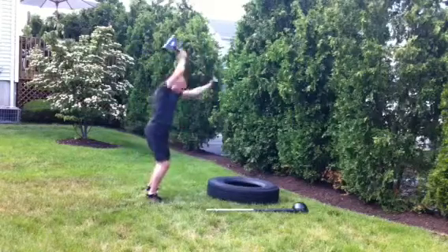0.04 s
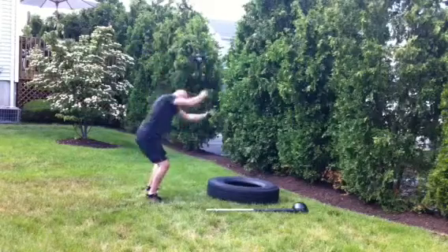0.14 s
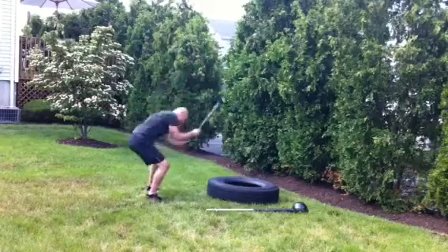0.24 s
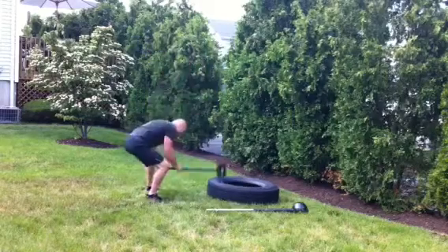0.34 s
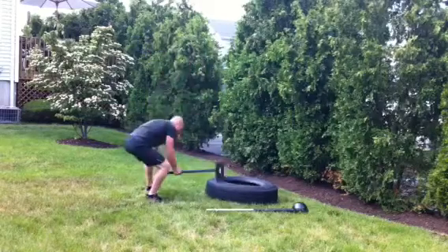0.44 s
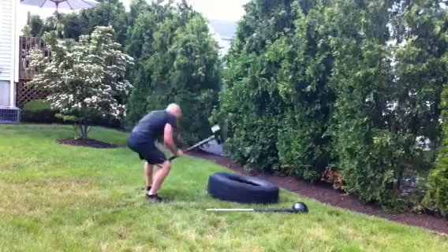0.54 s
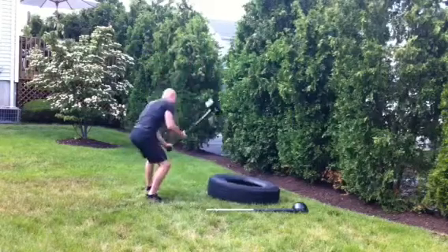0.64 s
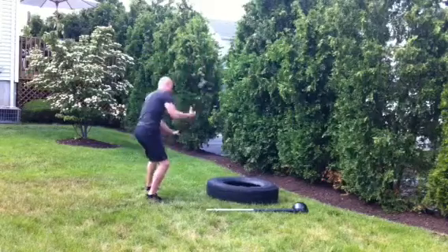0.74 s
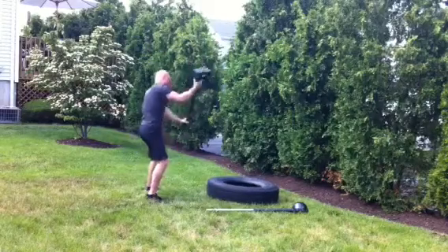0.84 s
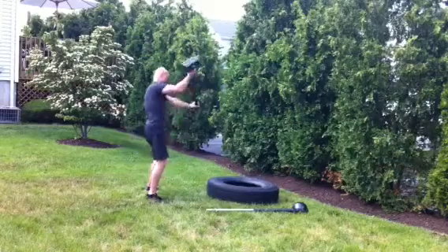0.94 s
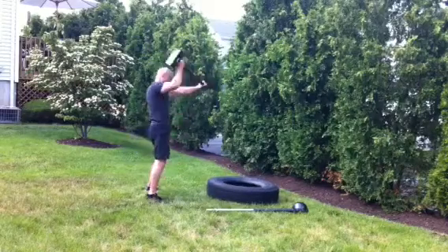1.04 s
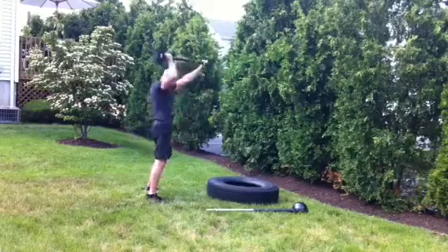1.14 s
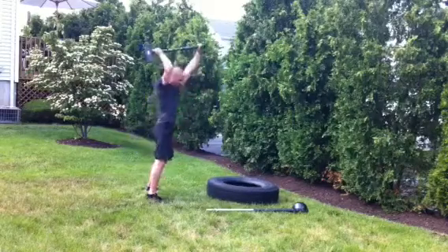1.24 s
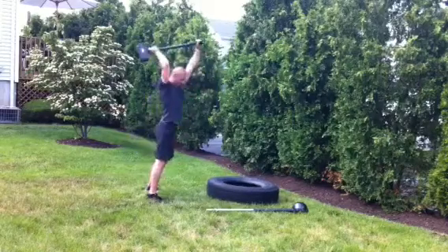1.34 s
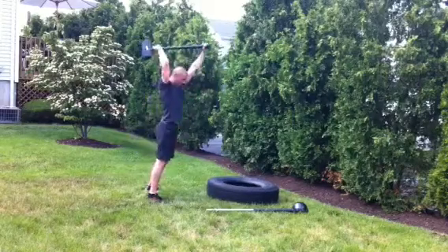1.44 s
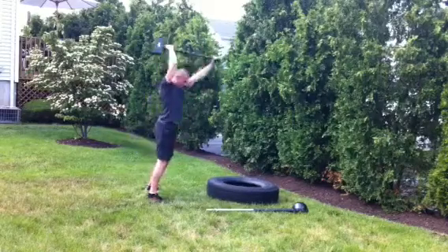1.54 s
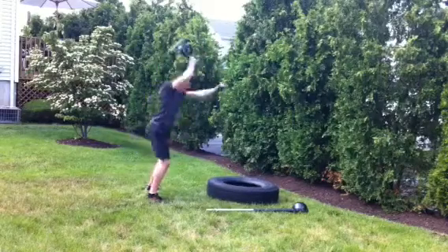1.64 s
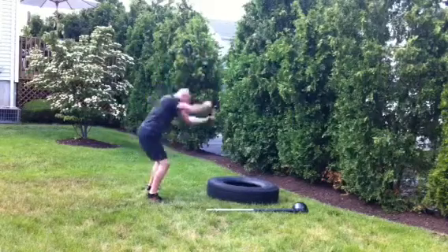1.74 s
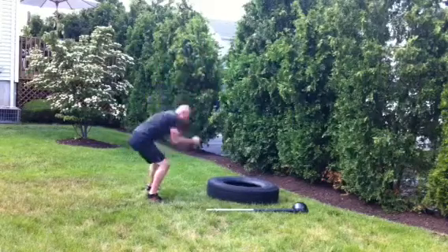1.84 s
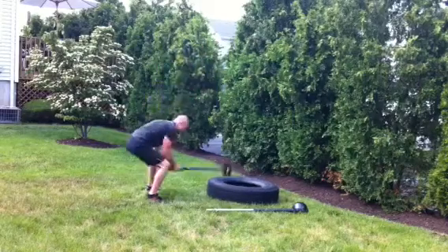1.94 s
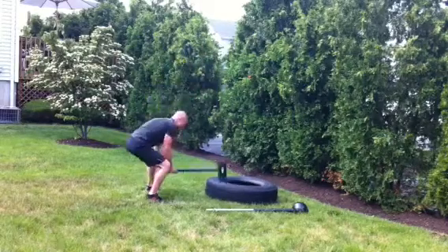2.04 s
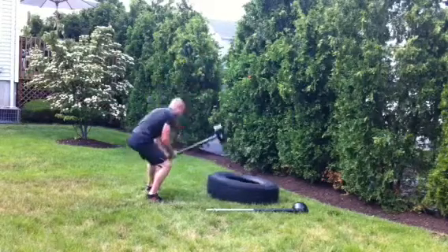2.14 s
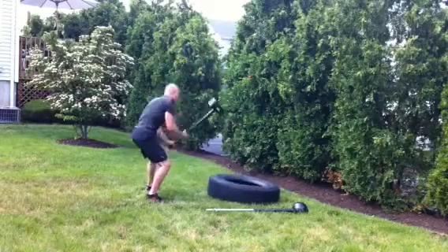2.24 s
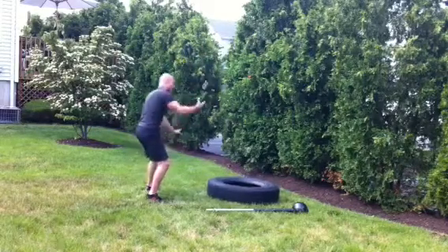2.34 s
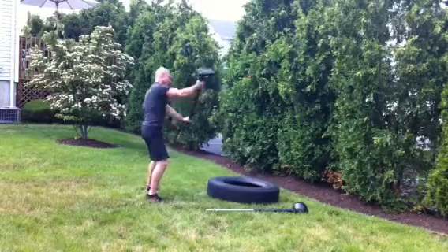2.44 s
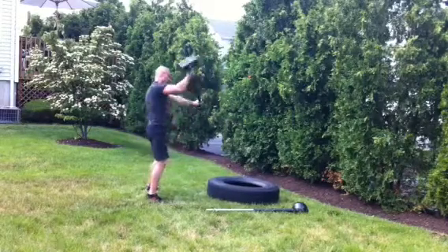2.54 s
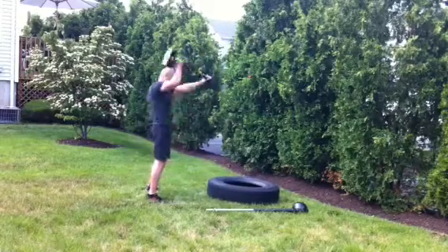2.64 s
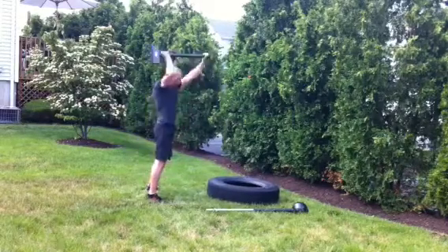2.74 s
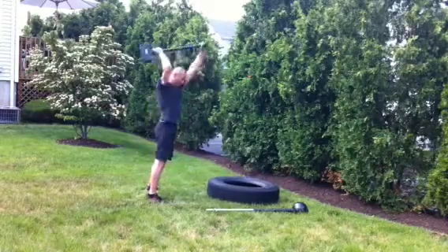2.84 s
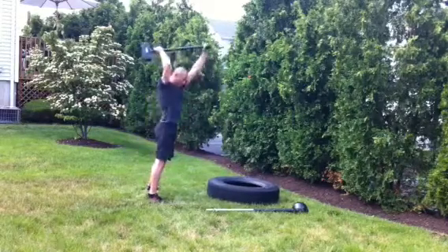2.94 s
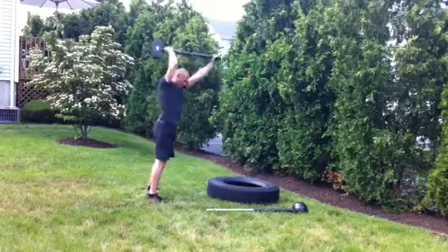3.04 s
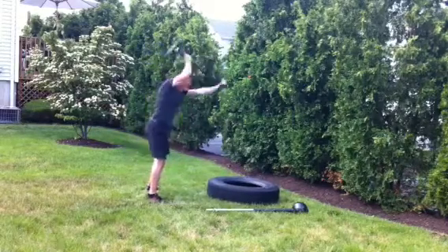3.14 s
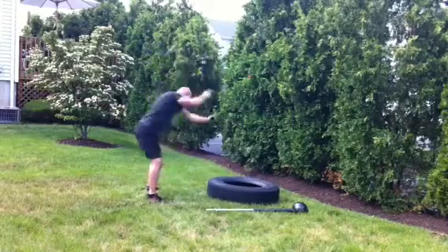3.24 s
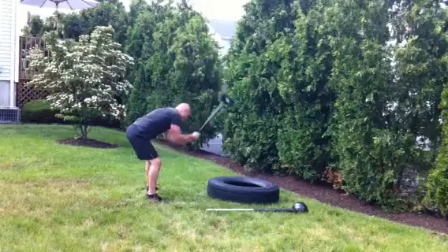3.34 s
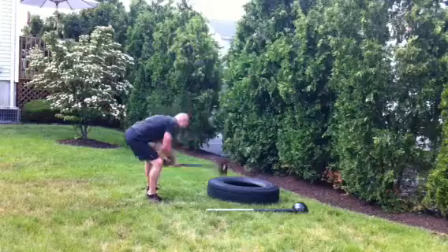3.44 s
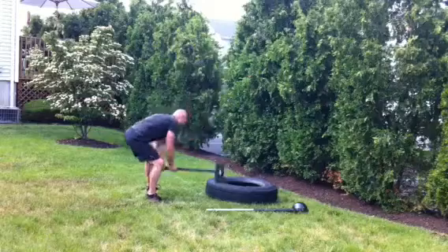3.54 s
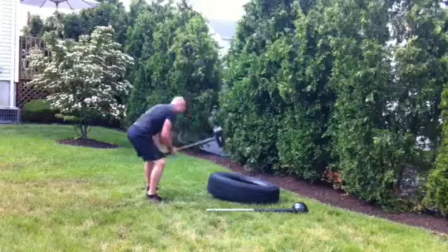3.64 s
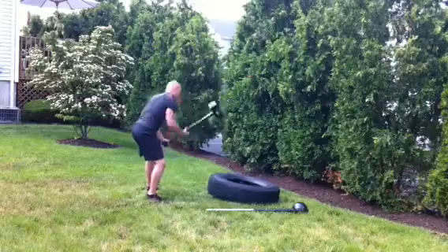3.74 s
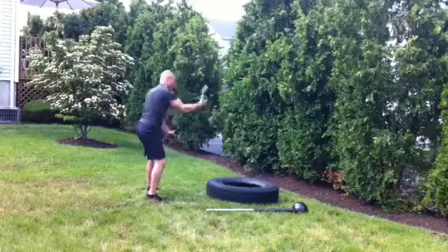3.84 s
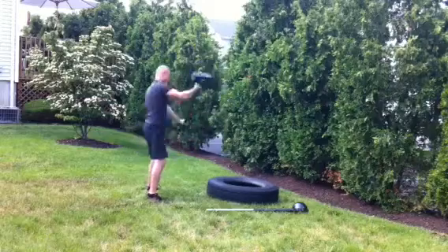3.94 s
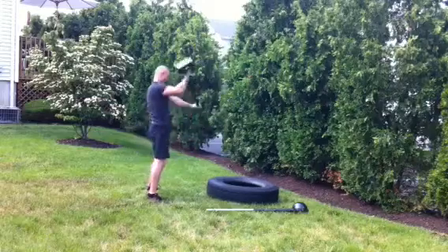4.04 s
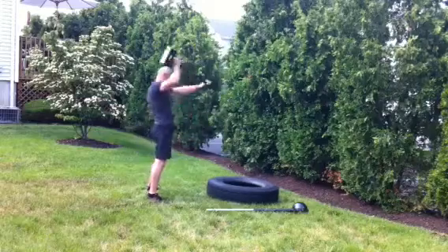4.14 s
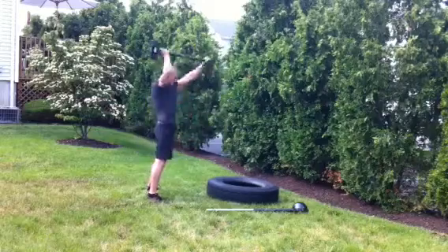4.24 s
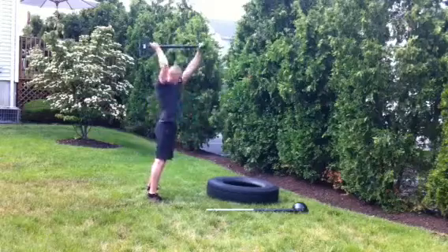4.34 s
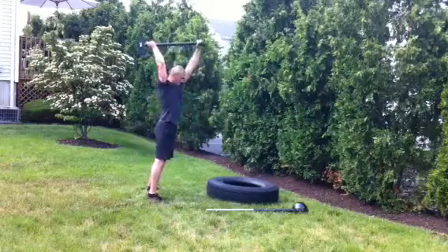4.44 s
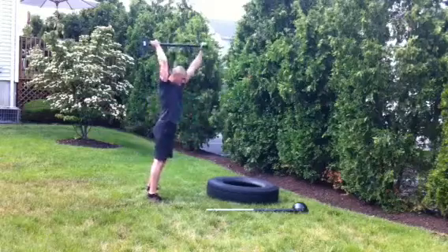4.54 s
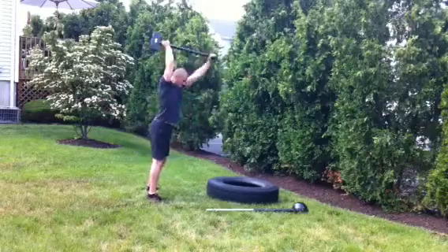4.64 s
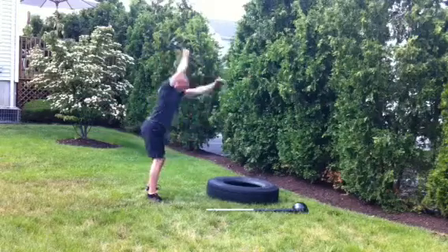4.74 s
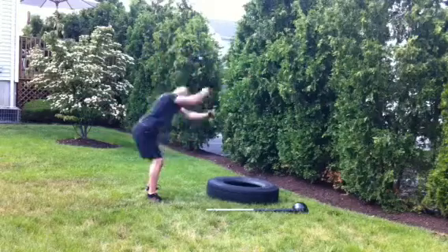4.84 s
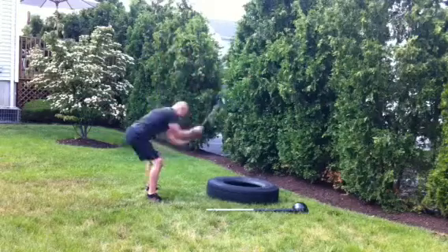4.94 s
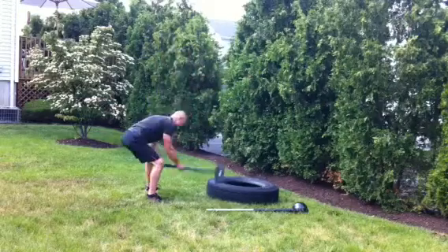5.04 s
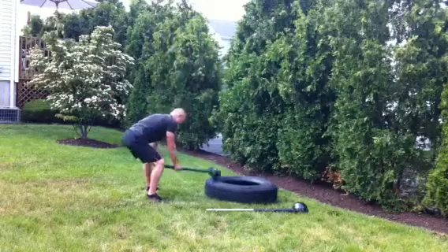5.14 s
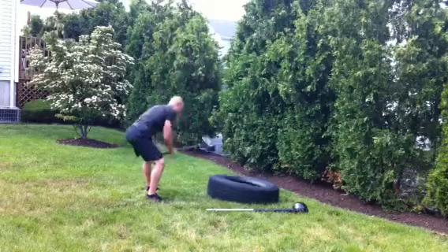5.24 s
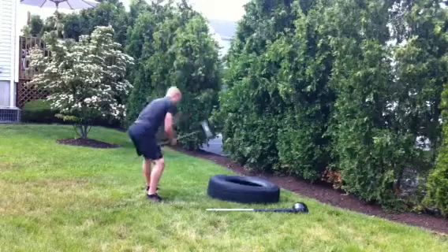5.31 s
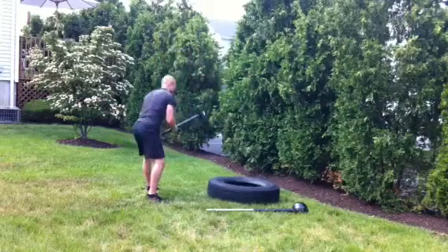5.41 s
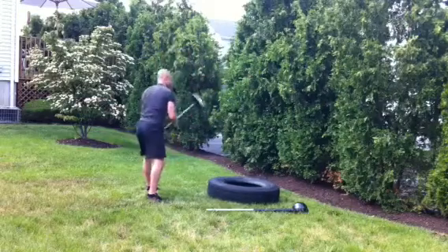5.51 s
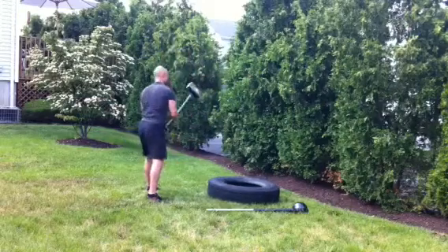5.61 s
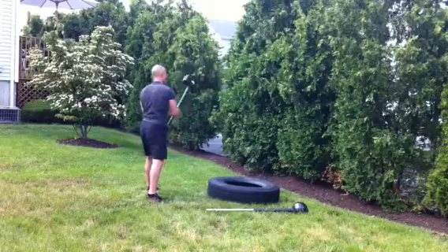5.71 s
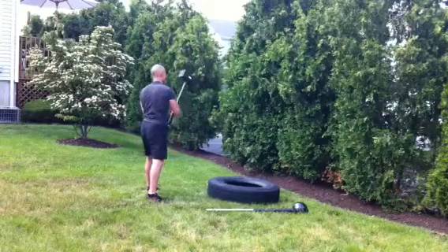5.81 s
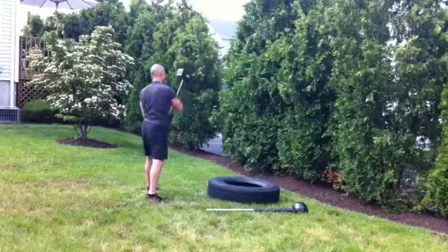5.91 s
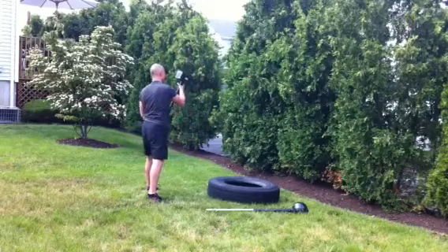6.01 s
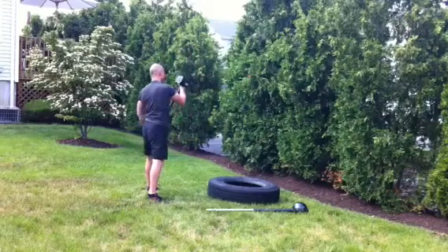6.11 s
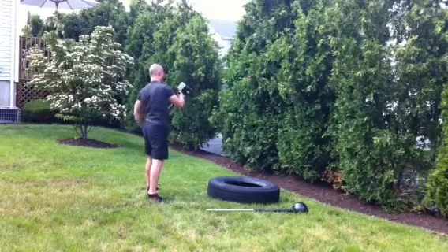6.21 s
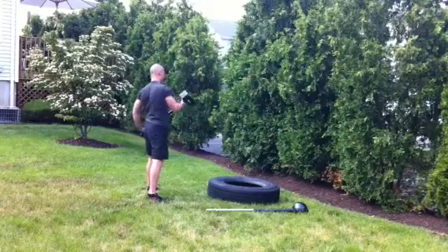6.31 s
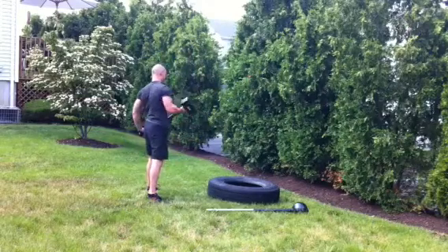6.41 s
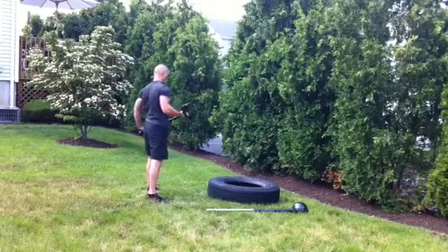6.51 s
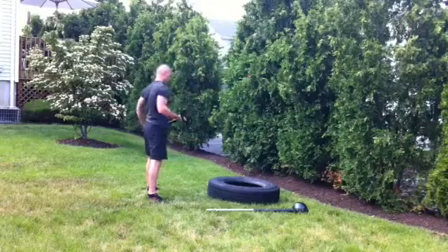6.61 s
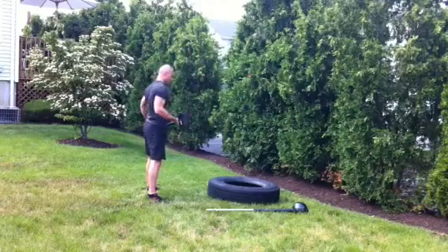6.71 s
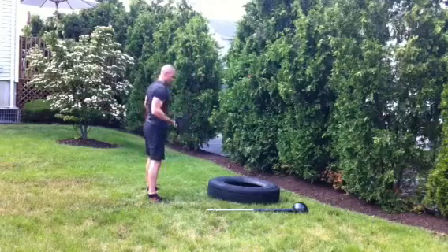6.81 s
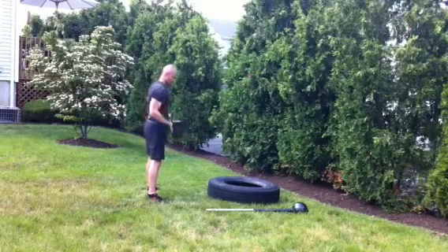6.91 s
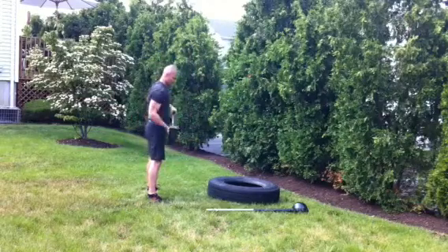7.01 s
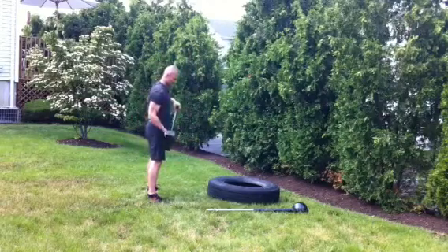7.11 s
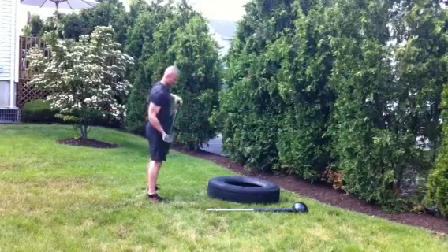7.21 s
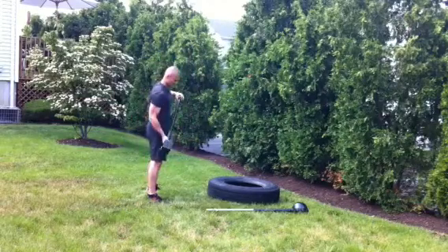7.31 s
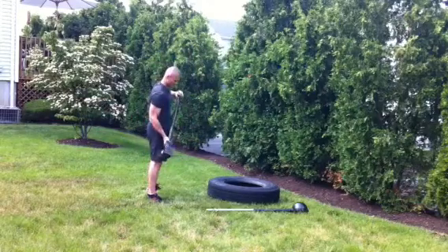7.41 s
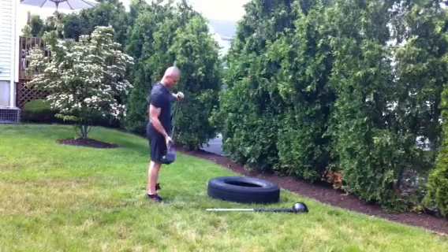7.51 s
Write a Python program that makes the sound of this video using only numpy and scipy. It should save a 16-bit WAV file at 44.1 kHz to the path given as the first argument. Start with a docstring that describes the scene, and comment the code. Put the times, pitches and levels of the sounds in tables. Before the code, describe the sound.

In a quiet garden, a hand squeaks faintly down a handle and a sledgehammer smacks into a tire, giving a hollow knock and a short rubbery boom. The palm brushes softly along the handle as it lifts again. There are four steady strikes, the second the deepest. The sound is mono, with a rapid digital crackle after each thud, and it ends on a faint hush of leaves and far traffic.

```python
"""A sledgehammer strikes a tire four times, on a lawn between a house and a hedge.
Each impact cracks, slaps and knocks on the rubber and excites the tire's modes in a brief boom;
the garden reflects and scatters it. Friction on the handle squeaks in each swing and rubs at each
lift; a few sharp snaps and light taps sound over a faint outdoor hush. A buffer fault slips scraps
of older sound into every block of samples, so a fast, even crackle trails each thud."""
import sys
import numpy as np
from scipy import signal
from scipy.fft import rfft, irfft
from scipy.io import wavfile
from scipy.ndimage import uniform_filter1d, map_coordinates

SR = 44100
rng = np.random.default_rng(int(sys.argv[2]) if len(sys.argv) > 2 else 0)


def persist_wave(psi):
    """Save psi, clipped to +-1, as 16-bit WAV."""
    counts = np.round(np.clip(psi, -1, 1) * 32767).astype(np.int16)
    wavfile.write(sys.argv[1], SR, np.atleast_2d(counts).T)


N = 333396

# hammer blows: start_s, slap_db, slap_hz, knock_db, knock_hz, crack_db, hollow_hz, hollow_share,
# boom_db, tilt_db_per_octave, scatter_db
BLOWS = [(0.5180, -8, 259, -7, 586, -20, 2570, 0.9, -22.5, 5.5, -25),
         (2.123, 2.5, 155, -8.5, 455, -25, 2150, 0.2, -15.5, 1.5, -25.5),
         (3.6252, -1.5, 244, -5.5, 652, -13.5, 1800, 0.43, -24.5, 7.5, -23),
         (5.2185, -3.5, 304, -11, 384, -11.5, 2350, 1, -22.5, -30, -24)]
def blows(bass_edge_hz=108):
    """Impact excitation: each blow drives four sounds at once, and the surroundings send them back."""
    out, t = np.zeros(N), np.arange(SR) / SR
    for (start_s, slap_db, slap_hz, knock_db, knock_hz, crack_db, hollow_hz, hollow_share,
         boom_db, tilt, scatter_db) in BLOWS:
        hit = amp(slap_db) * slap(slap_hz, t) + amp(knock_db) * sidewall_knock(knock_hz, t)
        hit += amp(boom_db) * boom(tilt, t)
        add(hit, 0, amp(crack_db) * double_contact(crack(), hollow_hz, hollow_share))
        hit = highpass(hit, bass_edge_hz)  # the deep bass of each hit is cut away
        add(out, start_s, hit)
        add_echoes(out, start_s, hit)
        scattered = double_contact(garden_scatter(), hollow_hz, 0.11 * hollow_share)
        add(out, start_s, amp(scatter_db) * scattered)
        add(out, start_s + 0.138, amp(boom_db) * wall_return(tilt, t))  # after the round trip
    return out

def slap(hz, t, glide=1.84, yield_s=0.00093, rise_s=0.00068, decay_cycles=0.79):
    """Heavily damped oscillation: the rubber caves in with a few pressure swings, falling in pitch."""
    pitch_hz = hz * (1 + glide * np.exp(-t / yield_s))
    phase = 2 * np.pi * np.cumsum(pitch_hz) / SR
    return -np.sin(phase) * (1 - np.exp(-t / rise_s)) * np.exp(-t * hz / decay_cycles)

def sidewall_knock(hz, t, t60_s=0.019):
    """Local resonance: the struck patch rings for an instant, at a pitch set by where the head lands."""
    return np.sin(2 * np.pi * hz * t) * amp(-60 * t / t60_s)

# modes of the tire: pitch_hz, relative_db, t60_s
TIRE_MODES = [(122.5, -1.5, 0.18), (134.86, 2, 0.59), (161.3, -2, 0.21), (215, -8, 0.48),
              (253.2, -12.5, 0.576), (293, -19.5, 0.26), (371.5, -14, 0.071), (530, -24, 0.068),
              (871, -14, 0.11)]
def boom(tilt_db_per_octave, t, rise_s=0.0037):
    """Modal superposition: the carcass and the air inside take up the blow and ring down."""
    pivot_hz = TIRE_MODES[1][0]
    ringing = np.zeros(len(t))
    for hz, db, t60_s in TIRE_MODES:
        tilted_db = db + tilt_db_per_octave * np.log2(hz / pivot_hz)
        ringing += amp(tilted_db - 60 * t / t60_s) * np.cos(2 * np.pi * hz * t)
    return ringing * (1 - np.exp(-t / rise_s))

# spectrum of steel striking rubber: frequency_hz, relative_db
CRACK_SPECTRUM = [(200, 15.5), (550, 0), (900, 5), (1300, -4), (2200, 7), (3200, -3), (4800, 8),
                  (6300, -5.5), (8000, 3), (15000, -15)]
def crack(length_s=0.001, size=2048):
    """A brief contact has a broad spectrum: steel meets rubber in a snap of coloured noise."""
    window = np.exp(-(np.arange(size) / SR / length_s) ** 4)
    puff = rng.standard_normal(size) * window
    for _ in range(4):  # each pass flattens the spectrum further
        puff = irfft(np.exp(1j * np.angle(rfft(puff))), size) * window
    log_gain = np.log(amp(curve_at(CRACK_SPECTRUM, abs(np.fft.fftfreq(size, 1 / SR)))))
    colour = np.exp(np.conj(signal.hilbert(log_gain)))[:size // 2 + 1]  # minimum phase, so causal
    return unit(irfft(rfft(puff) * colour, size)) * np.sqrt(length_s * SR / size)

def double_contact(x, hz, share):
    """Comb filtering: the face lands on one edge, then flat 1/hz later, making the smack hollow."""
    second = map_coordinates(x, [np.arange(len(x)) - SR / hz], order=3)
    return (x + share * second) / np.sqrt(1 + share ** 2)

# echoes from the hedge and the house: delay_s, gain_db, cutoff_hz
ECHOES = [(0.0108, -17, 5000), (0.033, -8.5, 480)]
def add_echoes(mix, start_s, hit):
    """Reflection: each surface returns one late, weaker, duller copy of the hit."""
    for delay_s, gain_db, cutoff_hz in ECHOES:
        add(mix, start_s + delay_s, amp(gain_db) * lowpass(hit, cutoff_hz))

# spectrum scattered by leaves and grass: frequency_hz, relative_db
SCATTER_SPECTRUM = [(25, 1.5), (75, -7.5), (130, 16.5), (300, 13), (600, 4), (1200, 0.5), (2500, -7.5),
                    (4200, -7), (7000, -9.5), (12000, -8), (16000, -5)]
def diffuse_tail(decay, rise_s, patchy_db=3.0):
    """Diffuse decay: scattered sound swells in, then dies unevenly, at its own rate in each band."""
    hz, t, bands = signal.stft(noise(SCATTER_SPECTRUM, SR), SR, nperseg=256)
    patches = uniform_filter1d(rng.standard_normal(bands.shape), size=3, axis=0)
    patches = unit(uniform_filter1d(patches, size=6, axis=1))
    gain_db = patchy_db * patches - 60 * t / curve_at(decay, hz)[:, None]
    dying = signal.istft(bands * amp(gain_db), SR, nperseg=256)[1][:SR]
    return dying * (1 - np.exp(-(np.arange(SR) / SR / rise_s) ** 2))

# decay of the near and of the far scatter: frequency_hz, t60_s
NEAR_DECAY = [(60, 0.74), (300, 0.1), (1500, 0.19), (5000, 0.24), (15000, 0.15)]
FAR_DECAY = [(60, 1), (150, 0.79), (400, 0.86), (1500, 0.99), (5000, 1), (15000, 0.3)]
def garden_scatter(near_db=7, far_db=-14):
    """Scattering: the near garden answers at once, the far garden later, softer and longer."""
    near = amp(near_db) * diffuse_tail(NEAR_DECAY, rise_s=0.0058)
    far = amp(far_db) * diffuse_tail(FAR_DECAY, rise_s=0.036)
    return near + far

def wall_return(tilt_db_per_octave, t, gain_db=-7, extra_t60_s=1):
    """Distant reflection: walls send the boom back dulled, with its onset blurred."""
    return amp(gain_db - 60 * t / extra_t60_s) * boom(tilt_db_per_octave - 4, t, rise_s=0.09)

# second snaps and light taps: start_s, level_db, centre_hz, t60_s
SNAPS_AND_TAPS = [(.5291, -19, 2100, .014), (3.277, -48, 950, .1), (3.278, -53, 2700, .06),
                  (3.6376, -13, 3500, .013), (5.2305, -22, 3500, .013), (4.028, -47, 3200, .05),
                  (5.091, -39, 8000, .012)]
def snaps_and_taps():
    """Damped transients: a second sharp snap about 12 ms after three blows; the rest are light taps."""
    out, t = np.zeros(N), np.arange(SR // 8) / SR
    for start_s, db, hz, t60_s in SNAPS_AND_TAPS:
        spectrum = [(hz / 4, -14), (hz / 2, -14), (hz, 0), (hz * 2.7, -18), (hz * 8, -40)]
        add(out, start_s, amp(db - 60 * t / t60_s) * noise(spectrum, len(t)))
    return out

# slides of the hand down the handle:
# start_s, rise_s, fade_s, first_hz, settled_hz, settling_s, peak_db, hiss_share
SQUEAKS = [(0.271, 0.044, .1, 10800, 8300, 0.034, -48.5, .75),
           (0.324, 0.017, 0.15, 8100, 6300, 0.015, -45.5, 0.4),
           (1.85, .05, .06, 9800, 9600, .05, -54.5, .25),
           (1.89, 0.059, 0.12, 9470, 7500, 0.065, -51.5, 0.87),
           (3.458, 0.019, 0.066, 5800, 8040, 0.011, -36.5, 0.07),
           (3.517, 0.013, 0.061, 7000, 8150, 0.0066, -42, 0.02),
           (5.003, 0.024, 0.16, 6300, 7840, 0.022, -40, 0.08)]
def squeaks(jitter=0.039, octave_db=-4, flutter_db=3, swell_db=21, fade_db=32):
    """Stick-slip friction: the grip gives an unsteady tone and its octave in hiss; the pitch settles."""
    out = np.zeros(N)
    for start_s, rise_s, fade_s, first_hz, settled_hz, settling_s, peak_db, hiss_share in SQUEAKS:
        t = np.arange(0, rise_s + fade_s, 1 / SR)
        hz = settled_hz + (first_hz - settled_hz) * np.exp(-t / settling_s)
        phase = 2 * np.pi * np.cumsum(hz * (1 + jitter * wander(770, len(t)))) / SR
        tone = unit(np.sin(phase) + amp(octave_db) * np.sin(2 * phase))
        hiss = noise([(800, -24), (3000, -5.5), (7500, 3.5), (11000, -2.5), (15000, -1.0)], len(t))
        envelope_db = peak_db - np.interp(t, [0, rise_s, rise_s + fade_s], [swell_db, 0, fade_db])
        level = amp(envelope_db + flutter_db * wander(180, len(t)))
        add(out, start_s, level * (np.sqrt(1 - hiss_share) * tone + np.sqrt(hiss_share) * hiss))
    return out

# shifts of the hand up the handle at the lifts: peak_s, level_db
RUBS = [(1.34, -56), (2.385, -59.5), (2.89, -55.5), (4.385, -55), (5.47, -52.5)]
# spectrum of the rubbing palm: frequency_hz, relative_db
RUB_SPECTRUM = [(1000, 5), (2200, 4), (4700, 4.5), (6500, 3.5), (15000, 0.5)]
def rubs(width_s=0.081, grain_db=1.5, grain_hz=200):
    """Sliding friction: the palm brushes the handle in a soft, grainy swish that swells and sinks."""
    t = np.arange(N) / SR
    level = sum(amp(db) * np.exp(-((t - peak_s) / width_s) ** 2 / 2) for peak_s, db in RUBS)
    return level * unit(noise(RUB_SPECTRUM, N) * amp(grain_db * wander(grain_hz, N)))

# spectrum of far traffic and leaves: frequency_hz, relative_db
HUSH_SPECTRUM = [(15, -48), (25, -38), (76, -16.5), (145, 3), (200, -3.5), (236, 1.5), (270, -9.5),
                 (354, -7), (384, -9), (463, -8), (1040, -8), (1440, -13), (1650, -15), (14800, -31),
                 (16000, -21.5)]
# tones of a distant machine: pitch_hz, relative_db
HUM_TONES = [(145.3, -83), (236.9, -85), (360.7, -66), (1061, -72.5)]
def outdoors(hush_db=-54, drift_db=0.83, hum_db=-1, waver_rad=0.63):
    """Ambient noise: traffic and leaves sum to a hush; phase modulation makes a machine's hum waver."""
    t = np.arange(N) / SR
    hush = noise(HUSH_SPECTRUM, N) * amp(hush_db + drift_db * wander(1.13, N))
    hum = sum(amp(db) * unit(np.sin(2 * np.pi * hz * t + waver_rad * wander(2.8, N)))
              for hz, db in HUM_TONES)
    return hush + amp(hum_db) * hum

def amp(db):
    return 10 ** (np.asarray(db) / 20)

def unit(x):
    return x / np.sqrt(np.mean(x ** 2) + 1e-20)

def curve_at(points, hz):
    """Interpolate (frequency_hz, value) points on a logarithmic frequency axis."""
    point_hz, value = np.transpose(points)
    return np.interp(np.log(hz + 1), np.log(point_hz + 1), value)

def add(mix, start_s, sound):
    part = mix[round(start_s * SR):][:len(sound)]
    part += sound[:len(part)]

def noise(spectrum, size):
    """Noise of unit RMS, shaped by (frequency_hz, relative_db) points."""
    gain = amp(curve_at(spectrum, np.fft.rfftfreq(size, 1 / SR)))
    return unit(irfft(rfft(rng.standard_normal(size)) * gain, size))

def wander(rate_hz, size):
    """Smooth random fluctuation of unit RMS."""
    hz = np.fft.rfftfreq(size, 1 / SR)
    return unit(irfft(rfft(rng.standard_normal(size)) / (1 + (hz / rate_hz) ** 4), size))

def lowpass(x, hz):
    return signal.sosfilt(signal.butter(2, hz, fs=SR, output="sos"), x)

def highpass(x, hz):
    return signal.sosfilt(signal.butter(4, hz, "high", fs=SR, output="sos"), x)

def scene():
    """Superposition: all sources add at one point, in mono."""
    return (blows() + squeaks() + rubs() + snaps_and_taps() + outdoors())[None]

def record(dry):
    """Discontinuities click: scraps of older sound cut into each block, then the band is limited."""
    block_samples, age_s, stale_share, cutoff_hz = 1024, 0.0432, 0.95, 15800
    sample = np.arange(N)
    place = sample % block_samples
    in_scrap = ((place >= 255) & (place < 291)) | ((place >= 300) & (place < 319))
    stale = dry[:, np.maximum(sample - round(age_s * SR), 0)]
    crackling = dry + stale_share * in_scrap * (stale - dry)
    band_limit = signal.firwin(255, cutoff_hz, window=("kaiser", 9), fs=SR)
    return signal.oaconvolve(crackling, band_limit[None], "same")

dry = scene()
out = record(dry)
persist_wave(out)
```